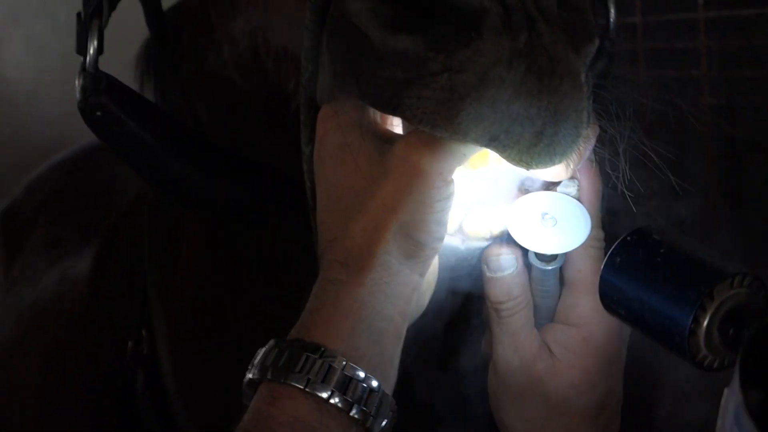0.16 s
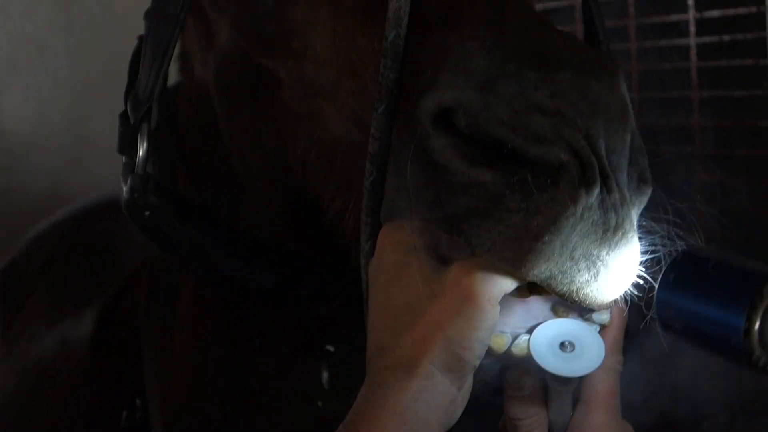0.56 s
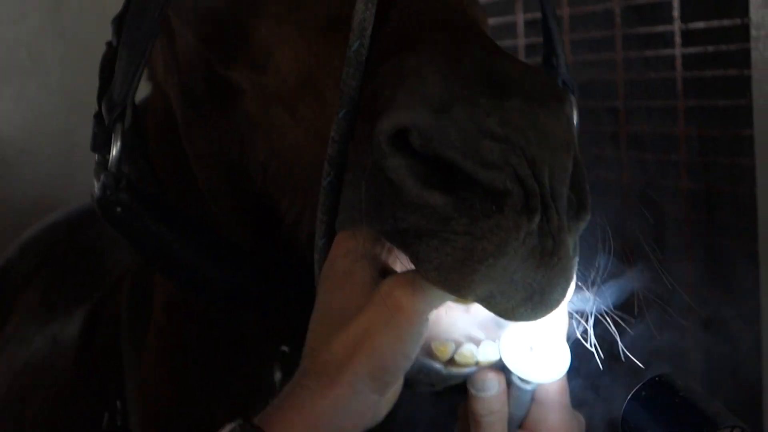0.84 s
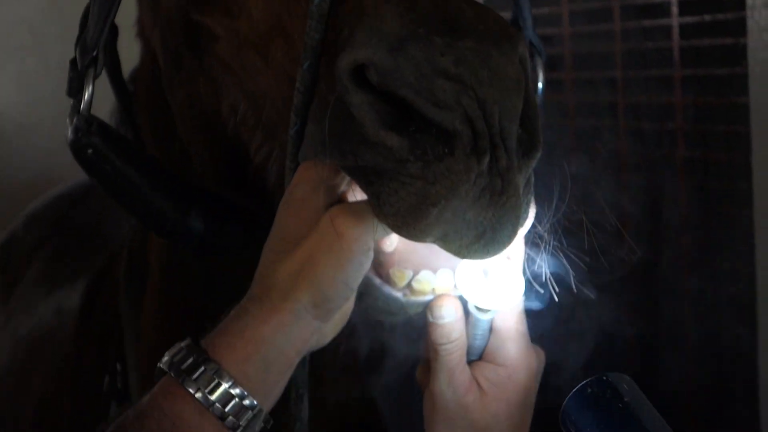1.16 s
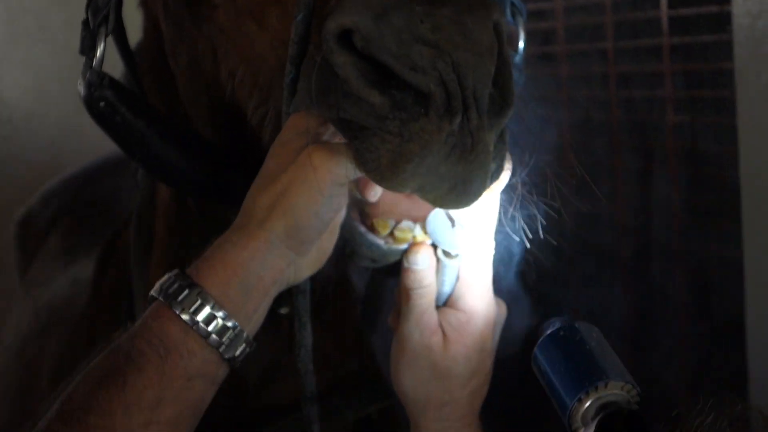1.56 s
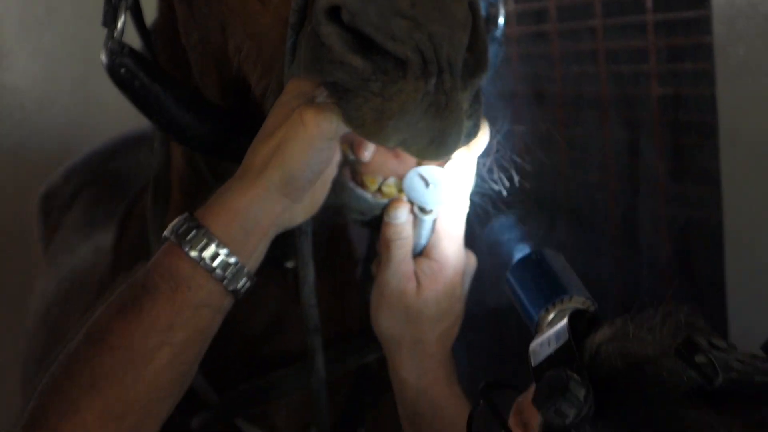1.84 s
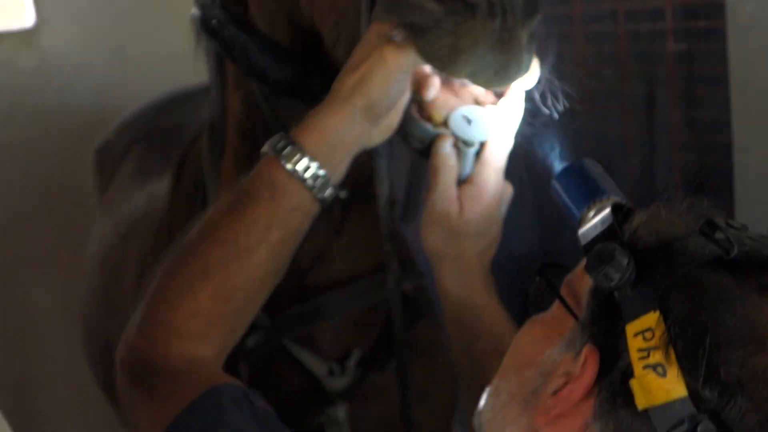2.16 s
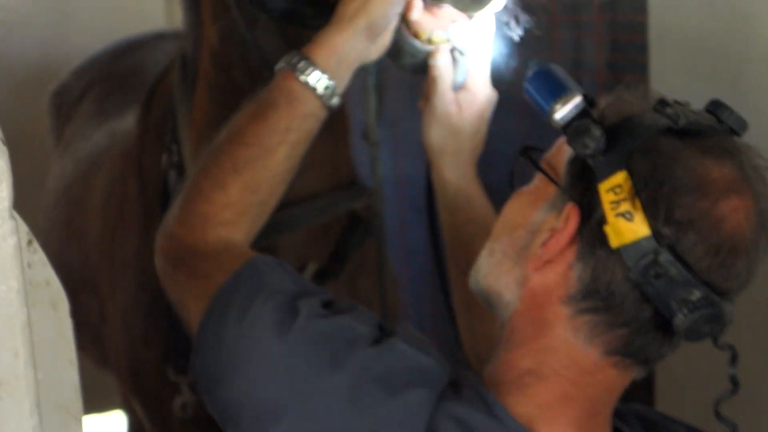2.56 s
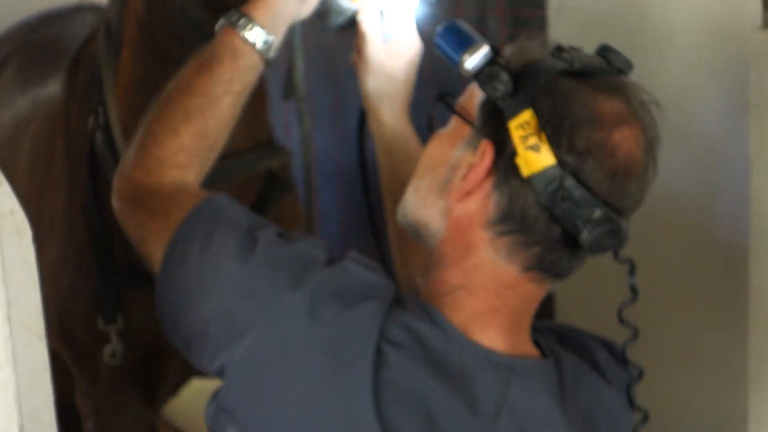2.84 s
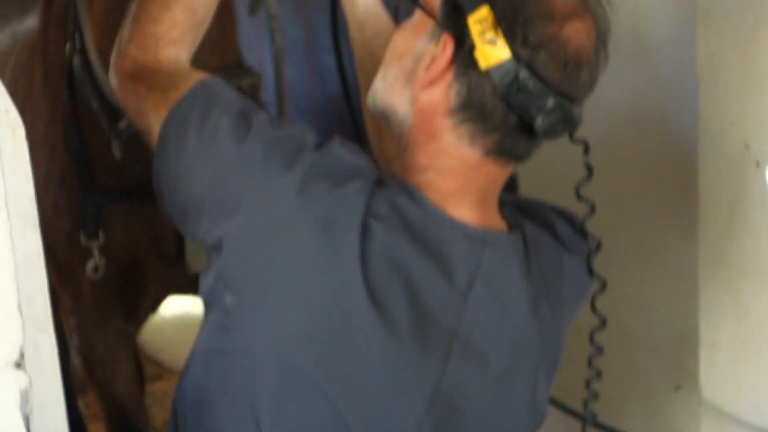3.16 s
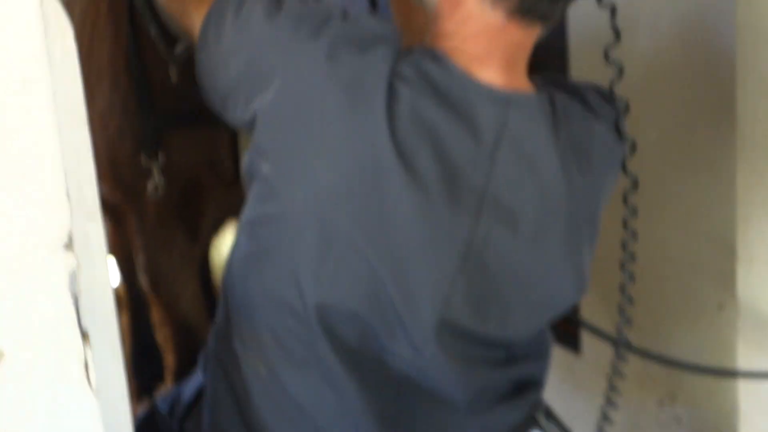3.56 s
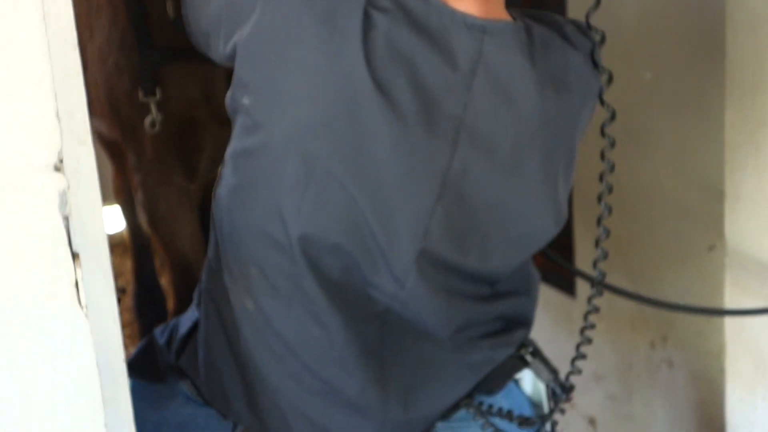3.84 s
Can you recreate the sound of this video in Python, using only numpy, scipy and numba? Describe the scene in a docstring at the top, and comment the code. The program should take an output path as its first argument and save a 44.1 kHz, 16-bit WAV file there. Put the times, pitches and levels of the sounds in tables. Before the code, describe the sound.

Harsh, squealing grinding of a tooth by a spinning disc slows to scrapes, pauses, and resumes.

```python
"""Tooth grinding in a stable

Stereo, heard close to the mouth: a small powered disc grinds a horse's front teeth. The disc bites once a turn,
so the rasp flutters; it slows to single scrapes, lifts off, then bites again and speeds up.
Grit noise hisses and rings the disc, gliding tones squeak on the tooth, filtered noise growls and thrums in the jaw.
Soft knocks and a faint whirr fill the lift; the stall adds a diffuse echo over quiet steady noise."""
import sys
import numpy as np
from scipy import signal
from scipy.fft import rfft, irfft
from scipy.io import wavfile
from scipy.ndimage import uniform_filter1d, minimum_filter1d
from numba import njit

SR = 44100
rng = np.random.default_rng(int(sys.argv[2]) if len(sys.argv) > 2 else 0)


def waveform_to_disk(signal):
    """Save audio, clipped to [-1, 1], as 16-bit WAV at the path in sys.argv[1]."""
    frames = np.transpose(np.atleast_2d(signal))
    scaled = np.clip(frames, -1, 1) * 32767
    samples = np.round(scaled).astype(np.int16)
    wavfile.write(sys.argv[1], SR, samples)


N = 176400

# Spectrum of the stable's background. Each row: frequency in Hz, level in dB.
BACKGROUND_COLOUR = [(30, -30.5), (100, -21), (250, -7.5), (1300, 2), (6700, -20), (15000, -54)]
# Stereo spread of the close sound. Each row: frequency in Hz, side level in dB.
SIDE_COLOUR = [(320, -54.5), (800, -23), (5000, -7)]
# The disc whirring free of the tooth. Each row: time in seconds, level in dB.
WHIRR_LEVEL = [(1.75, -75), (1.82, -54.5), (2.12, -55), (2.2, -83)]
# Spectrum of that whirr. Each row: frequency in Hz, level in dB.
WHIRR_SPECTRUM = [(200, -22), (700, 4.5), (1000, -6), (2500, 1.5), (4900, -2.5), (6500, -10.5),
                  (13300, -25.5)]
# Soft knocks at the mouth while the disc is lifted. Each row: start in seconds, strength in dB.
MOUTH_KNOCKS = [(1.788, -39.5), (1.802, -43), (1.85, -48), (1.94, -49), (2.085, -49.5), (2.11, -45.5)]
# Hollow resonances of the knocks. Each row: frequency in Hz, width in Hz, level in dB.
KNOCK_RESONANCES = [(705, 94, 2.5), (1142, 120, -4), (1540, 430, -10)]
# Resonance of the mouth as lips and hand move. Each row: time in seconds, frequency in Hz.
MOUTH_RESONANCE = [(1.1, 2500), (2.22, 1720), (2.5, 2200), (3.1, 2830), (3.65, 2251)]
# Disc speed. Each row: time in seconds, turns per second.
DISC_SPEED = [(0, 124), (.4, 95), (.56, 83), (.65, 89), (.81, 68.5), (.95, 47.4), (1.05, 17.4), (2.1, 20.2),
              (2.3, 57.7), (2.52, 91), (2.77, 100), (3.2, 118), (3.42, 90.6), (3.5, 81), (3.65, 105.5),
              (4, 109.5)]
# Contact with the tooth. Each row: time in seconds, depth of the once-a-turn flutter in dB, unevenness in turns.
CONTACT = [(0, 16, 0.056), (.5, 16, 0.033), (.88, 10.5, .1), (2.2, 7.5, .27), (2.7, 13.5, 0.03838),
           (3.1, 2.5, 0.051), (3.27, 13.5, 0.23), (3.6, 14, .17), (3.75, 5, 0.098), (4, 14.5, 0.092)]
# Grinding drive. Each row: time in seconds, treble rasp in dB, midrange growl in dB.
GRIND_LEVEL = [(0, -16, -29), (.32, -17, -27.5), (.42, -20.5, -28), (.72, -18.5, -30), (.85, -19.5, -26),
               (.97, -26, -32), (1.03, -34.5, -35.5), (1.22, -40.5, -45.5), (1.45, -52, -46),
               (1.52, -85, -59), (2.12, -86.5, -64), (2.17, -35.5, -63), (2.21, -20.5, -32),
               (2.55, -17.5, -27.5), (2.83, -18, -30), (2.96, -21.5, -28.5), (3.18, -22, -27.5),
               (3.25, -17.5, -29), (3.31, -21, -29.5), (3.5, -20.5, -32), (3.545, -24.5, -30),
               (3.58, -17.5, -28), (3.76, -19.5, -28.5), (4, -20, -30.5)]
# Single scrapes as the disc drags or catches again.
# Each row: start in seconds, length in seconds, rasp in dB, growl in dB.
SINGLE_SCRAPES = [(0.96, 0.0045, -17, -27.5), (.978, 0.0037, -26, -38), (1.002, 0.0032, -29, -28),
                  (1.011, 0.0076, -18.5, -28.5), (1.054, .022, -25.5, -28.5), (1.11, 0.021, -24, -30.5),
                  (1.17, 0.0074, -22, -25.5), (1.189, 0.0048, -26, -27), (1.252, 0.0068, -16.5, -28),
                  (1.304, .01, -21, -30.5), (1.346, 0.0063, -28, -41), (1.359, 0.0035, -21, -29),
                  (1.409, 0.013, -25.5, -43), (1.475, 0.014, -29.5, -37.5), (1.841, .025, -62, -70),
                  (2.128, 0.026, -43.5, -41), (2.151, 0.01, -25.5, -32), (2.18, 0.018, -20.5, -29.5),
                  (3.563, 0.0045, -22, -38)]
# Squeak pitches that shift with the point of contact. Each row: time in seconds, lower in Hz, upper in Hz.
SQUEAK_PITCH = [(0, 5160, 9175), (.35, 5345, 8846), (.44, 5850, 9800), (.71, 5900, 9500), (.83, 4875, 8637),
                (.97, 4163, 8500), (1.13, 4500, 8550), (1.31, 3750, 8600), (1.36, 4934, 8720),
                (2.42, 5360, 9070), (2.56, 7040, 9820), (2.88, 7287, 9730), (2.99, 5103, 9223),
                (3.35, 5298, 9322), (3.47, 4127, 9040), (4, 4571, 9600)]
# How freely tooth and disc sound. Each row: time in seconds, lower squeak, upper squeak and disc ring in dB.
RINGING_LEVEL = [(.15, -13.5, -7, -5), (.5, -11, -4, -6.5), (.9, -6.5, -5, -6), (1.17, -4.5, -17.5, -6),
                 (1.3, -5.5, 0, -2), (2.3, -10, -8, -6.5), (2.65, -13, -8, -9), (3.46, -4.5, -4, -5),
                 (3.68, -18, -8.5, -6)]
# Spectrum of the gritty hiss. Each row: frequency in Hz, level in dB.
HISS_COLOUR = [(1000, -32), (2800, -8), (4100, 0.5), (5500, 1), (6800, -1), (8200, 1), (11000, -3),
               (12500, 0.5), (14500, 1), (16000, -6)]
# Spectrum of the growl of the teeth. Each row: frequency in Hz, level in dB.
GROWL_COLOUR = [(100, -37), (520, -19.5), (950, -12.5), (1450, -9), (1700, -3.5), (2500, -1), (3400, -3.5),
                (6000, -16)]
# Spectrum of the jaw's thrum. Each row: frequency in Hz, level in dB.
JAW_COLOUR = [(60, -47.5), (170, -15), (260, -4), (328, 8.5), (410, -6), (600, -32.5)]
# Level of the jaw's thrum. Each row: time in seconds, level in dB.
THRUM_LEVEL = [(0, -52.5), (.2, -48.5), (.44, -41.5), (.53, -48.5), (1.25, -53.5), (1.65, -69), (2.13, -76),
               (2.23, -54), (3.1, -50.5), (3.33, -59.5), (3.44, -51), (4, -48.5)]

BACKGROUND_DB, BACKGROUND_SIDE_DB = -53, -13.5  # side relative to mid
# The stall's two echoes, one below the cutoff and one of the full sound.
DULL_T60_S, DULL_DB, DULL_CUTOFF_HZ = 0.89, -9.5, 5750
FULL_T60_S, FULL_DB = .45, -17.5
BALANCE_DB, LEAN_ABOVE_HZ = -1.05, 1000  # treble of left against right
CEILING, TOP_HZ = 1, 15750  # peak limit (full scale = 1), recorder's upper cutoff
KNOCK_DECAY_S = 0.01
MOUTH_LAG_S, MOUTH_DB, MOUTH_SHIFTS_PER_S = .0023, -7.5, 8  # mean lag, joint level, pace of change
CAVITY_WIDTH_HZ, CAVITY_DB = 360, -7
# One bite: closing, mean hold and easing in turns; scatter of the hold (log); scatter of the flutter depth.
BITE_RISE, BITE_HOLD, BITE_FALL, BITE_SPREAD, TURN_SCATTER_DB = .16, .2, .23, .36, .6
CATCH_DB = 3  # stick and slip within a bite
SQUEAL_SCATTER_DB, PITCH_SCATTER, CHIRP = 3, .028, .09  # strength; share of pitch; share of pitch per turn
LOWER_WIDTH_HZ, UPPER_WIDTH_HZ = 340, 640  # rms pitch tremble
DISC_HZ, DISC_WIDTH_HZ = 13250, 340
GRIT_DB, HISS_DB = 2.5, -3.5  # scatter of grain size, hiss level
HISS_FOLLOW, GROWL_FOLLOW = 0.66, 0.36  # exponents on the contact force
SCRAPE_ATTACK_S, SCRAPE_RELEASE_S = 0.0023, 0.003
BRUSH_S, BRUSH_DB = 0.0061, -15  # the slow disc brushes the tooth just before it bites


def undb(db):
    """Decibels to gain."""
    return 10 ** (np.asarray(db) / 20)


def unit(x):
    """Scale to rms 1."""
    return x / np.sqrt(np.mean(x ** 2))


def curve(table, axis=1):
    """One column of a table, joined by straight lines in time."""
    rows = np.array(table, float)
    return np.interp(np.arange(N) / SR, rows[:, 0], rows[:, axis])


def colour(x, table):
    """Filter by (Hz, dB) points, joined along log frequency."""
    rows = np.array(table, float)
    hz = np.maximum(np.arange(N // 2 + 1) * SR / N, 1)
    gain = undb(np.interp(np.log(hz), np.log(rows[:, 0]), rows[:, 1]))
    return irfft(rfft(x) * gain, N)


def butter(x, order, hz, kind):
    """Butterworth filter."""
    return signal.sosfilt(signal.butter(order, hz, kind, fs=SR, output="sos"), x)


@njit
def svf(x, hz, width):
    """Band-pass with a moving centre: a state-variable filter with peak gain 1."""
    y, band, low = np.empty(len(x)), 0., 0.
    for i in range(len(x)):
        g = np.tan(np.pi * hz[i] / SR)
        k = np.pi * width / SR * (1 + g * g) / g
        v = (band + g * (x[i] - low)) / (1 + g * (g + k))
        band, low, y[i] = 2 * v - band, low + 2 * g * v, k * v
    return y


def ring(x, hz, width):
    """A resonance that keeps the power of white noise."""
    centre = np.clip(hz * np.ones(N), 20, SR * .45)
    return svf(x, centre, float(width)) * np.sqrt(SR / np.pi / width)


def noise():
    """White noise."""
    return rng.standard_normal(N)


def background():
    """Steady noise of the stable: independent mid and side give it a little width."""
    mid, side = (unit(colour(noise(), BACKGROUND_COLOUR)) for _ in range(2))
    return undb(BACKGROUND_DB) * (mid + undb(BACKGROUND_SIDE_DB) * side * np.array([[1], [-1]]))


def echo(x, t60_s):
    """A cloud of reflections that swells fast and dies away; its response has unit energy."""
    t = np.arange(SR) / SR
    decay_s = t60_s / np.log(1000)
    envelope = np.exp(-t / decay_s) * (1 - np.exp(-10 * t / decay_s))
    tail = (rng.standard_normal(SR) * envelope)[t < 10 * decay_s]
    return signal.oaconvolve(x, tail / np.linalg.norm(tail))[:N]


def stall(x):
    """The direct sound, a longer dull echo of the stall and a shorter, weaker full-band one."""
    dull = butter(x, 4, DULL_CUTOFF_HZ, "low")
    return x + undb(DULL_DB) * echo(dull, DULL_T60_S) + undb(FULL_DB) * echo(x, FULL_T60_S)


def whirr():
    """Faint airy sound of the disc off the tooth: coloured noise."""
    return unit(colour(noise(), WHIRR_SPECTRUM)) * undb(curve(WHIRR_LEVEL))


def knocks():
    """Soft hollow knocks: short decaying noise pushes excite a few broad resonances."""
    t = np.arange(N) / SR
    envelope = np.zeros(N)
    for start, db in MOUTH_KNOCKS:
        envelope += undb(db) * (t > start) * np.exp(-np.clip((t - start) / KNOCK_DECAY_S, 0, 20))
    push = butter(noise() * envelope, 2, [480, 2300], "band")
    return sum(undb(db) * ring(push, hz, width) for hz, width, db in KNOCK_RESONANCES)


def mouth(x, count=12):
    """Very short reflections between lips, teeth and hands, whose strengths shift as they move."""
    t, reflected = np.arange(N) / SR, 0
    lags = rng.exponential(MOUTH_LAG_S, count)
    for lag, strengths in zip(lags, rng.standard_normal((count, 400))):
        strength = np.interp(t * MOUTH_SHIFTS_PER_S, np.arange(len(strengths)), strengths)
        reflected = reflected + strength * np.pad(x, (int(lag * SR), 0))[:N]
    return (x + undb(MOUTH_DB) * reflected / np.sqrt(count)) / np.hypot(1, undb(MOUTH_DB))


def grit():
    """Dense clicks of abrasive grains of uneven size."""
    return unit(noise() * undb(GRIT_DB * noise()))


def catches():
    """The disc catches and slips every few milliseconds: a random gain."""
    return unit(undb(CATCH_DB * unit(uniform_filter1d(noise(), size=100))))


def turns():
    """The disc bites once a turn, held unevenly: contact force, and each squeak's pitch factor and strength."""
    phase = np.cumsum(curve(DISC_SPEED)) / SR
    chance = rng.standard_normal((1000, 9))  # a row for each turn
    slip = np.interp(phase, np.arange(len(chance)), chance[:, 0])
    phase = np.maximum(phase + curve(CONTACT, axis=2) * slip, 0)
    own, within = chance[phase.astype(int)].T, phase % 1
    depth, pitch, strength, length, glide = own[1], own[2:4], own[4:6], own[6], own[7:]
    held = np.minimum(BITE_HOLD * np.exp(BITE_SPREAD * length), .5)
    easing = np.exp(-np.maximum(within - BITE_RISE - held, 0) / BITE_FALL)
    bite = np.minimum(within / BITE_RISE, 1) * easing
    force = undb(bite * (curve(CONTACT) + TURN_SCATTER_DB * depth)) * catches()
    force = force / np.sqrt(uniform_filter1d(force ** 2, size=2600))  # even local power
    squeal = undb(SQUEAL_SCATTER_DB * bite * strength)
    detune = 1 + PITCH_SCATTER * pitch + CHIRP * glide * (within - BITE_RISE)
    return force, detune, squeal


def scrapes():
    """Rasp and growl envelopes of the single scrapes: a light brush, the bite, a quick release."""
    t, out = np.arange(N) / SR, np.zeros((2, N))
    for start, length, rasp_db, growl_db in SINGLE_SCRAPES:
        brush = undb(BRUSH_DB) * np.exp(-np.clip((start - t) / BRUSH_S, 0, 20))
        attack = np.clip((t - start) / SCRAPE_ATTACK_S, brush, 1)
        release = np.exp(-np.clip((t - start - length) / SCRAPE_RELEASE_S, 0, 20))
        out += undb([[rasp_db], [growl_db]]) * attack * release
    return out * catches()


def squeak(hz, width):
    """A stick-slip tone: a sine whose pitch trembles over the given width."""
    tremble = unit(uniform_filter1d(noise(), size=24))
    return np.sqrt(2) * np.sin(2 * np.pi * np.cumsum(hz + width * tremble) / SR)


def tooth_and_disc(force, detune, squeal, scrape):
    """Treble rasp: the tooth squeaks at two pitches, grit hisses and rings the disc."""
    level = undb(curve(GRIND_LEVEL))
    drive = force * squeal * level + scrape
    rub = force ** HISS_FOLLOW * level + scrape
    lower = squeak(curve(SQUEAK_PITCH) * detune[0], LOWER_WIDTH_HZ) * drive[0]
    upper = squeak(curve(SQUEAK_PITCH, axis=2) * detune[1], UPPER_WIDTH_HZ) * drive[1]
    disc = ring(grit() * rub, DISC_HZ, DISC_WIDTH_HZ)
    rasp = undb(HISS_DB) * unit(colour(grit(), HISS_COLOUR)) * rub
    for axis, part in enumerate((lower, upper, disc), 1):
        rasp += undb(curve(RINGING_LEVEL, axis)) * part
    return butter(rasp, 2, 1800, "high")


def teeth_growl(force, scrape):
    """Midrange growl: coloured grit under the contact force, with the moving mouth resonance added."""
    grains = grit()
    drive = force ** GROWL_FOLLOW * undb(curve(GRIND_LEVEL, axis=2)) + scrape
    growl = colour(grains * drive, GROWL_COLOUR) / np.std(colour(grains, GROWL_COLOUR))
    cavity = 2 * svf(growl, curve(MOUTH_RESONANCE), float(CAVITY_WIDTH_HZ))
    return (growl + undb(CAVITY_DB) * cavity) / np.hypot(1, undb(CAVITY_DB))


def jaw_thrum(force):
    """Low thrum: noise pulsed by the contact force, filtered by the jaw."""
    return unit(colour(noise() * force, JAW_COLOUR)) * undb(curve(THRUM_LEVEL))


def grinding(force, detune, squeal, rasp_scrapes, growl_scrapes):
    """Rasp and growl reflect within the mouth; the jaw thrums below."""
    rasp = tooth_and_disc(force, detune, squeal, rasp_scrapes)
    return mouth(rasp + teeth_growl(force, growl_scrapes)) + jaw_thrum(force)


def scene():
    """Both channels share the bites; the fine grit spreads wide and its treble leans a little to the right."""
    contact = (*turns(), *scrapes())
    mid, side = (stall(grinding(*contact) + knocks() + whirr()) for _ in range(2))
    high_pass = signal.butter(2, LEAN_ABOVE_HZ, "high", fs=SR, output="sos")
    upper = signal.sosfiltfilt(high_pass, mid)
    side = colour(side, SIDE_COLOUR) + (undb(BALANCE_DB / 2) - 1) * upper
    return np.array([mid + side, mid - side]) + background()


def record(dry):
    """The recorder limits the highest peaks, both channels alike, and cuts the top."""
    room_left = CEILING / np.maximum(np.abs(dry).max(axis=0), CEILING)
    gain = uniform_filter1d(minimum_filter1d(room_left, size=128), size=128)
    return signal.sosfilt(signal.ellip(10, .2, 80, TOP_HZ, fs=SR, output="sos"), dry * gain)


dry = scene()
out = record(dry)
waveform_to_disk(out)
```